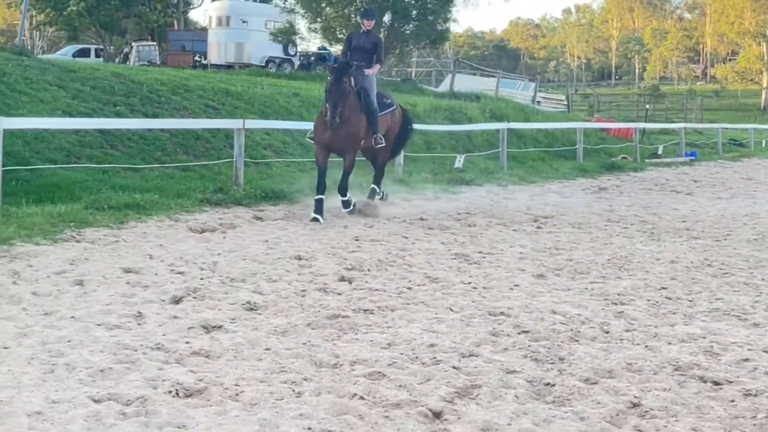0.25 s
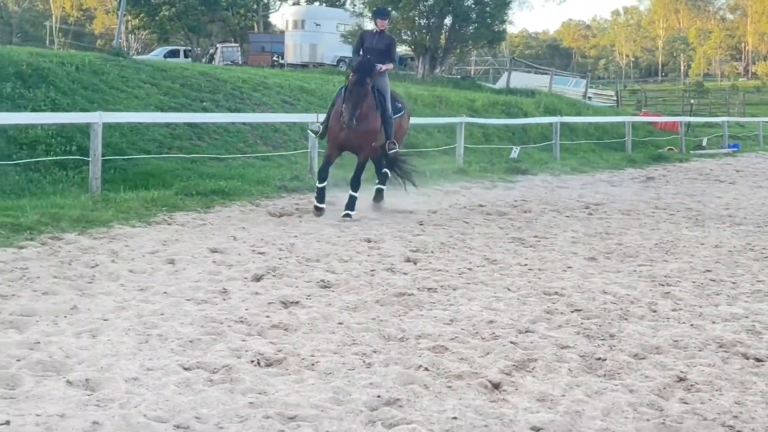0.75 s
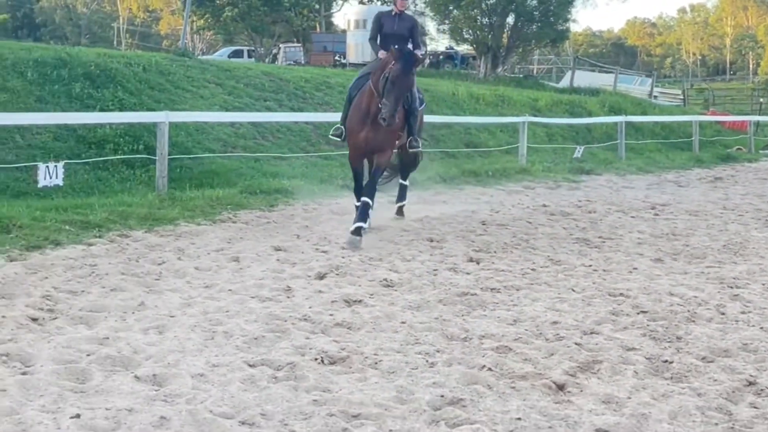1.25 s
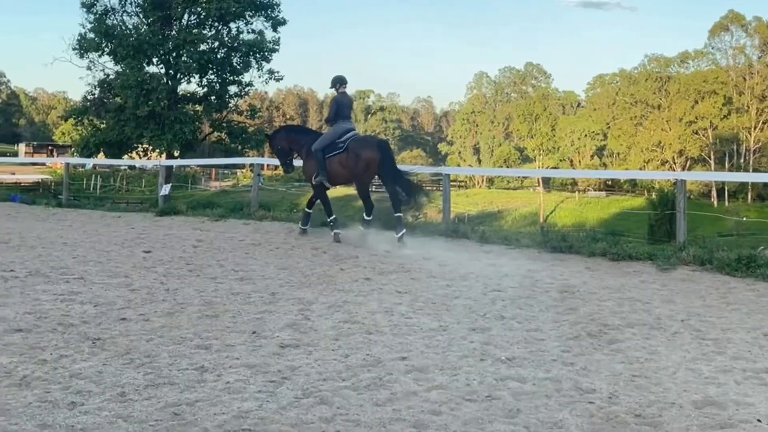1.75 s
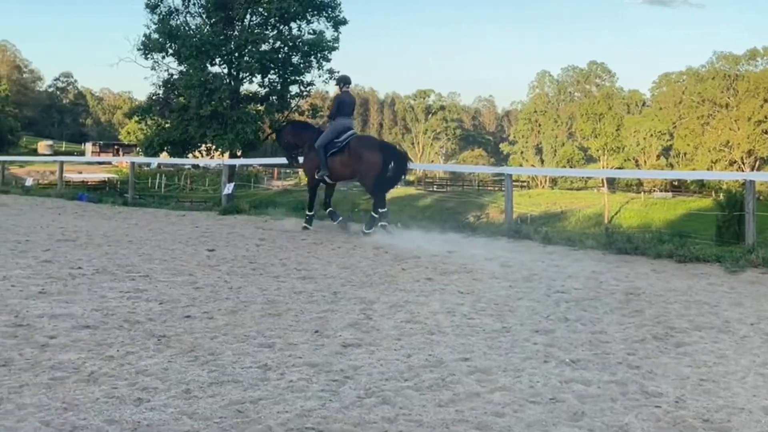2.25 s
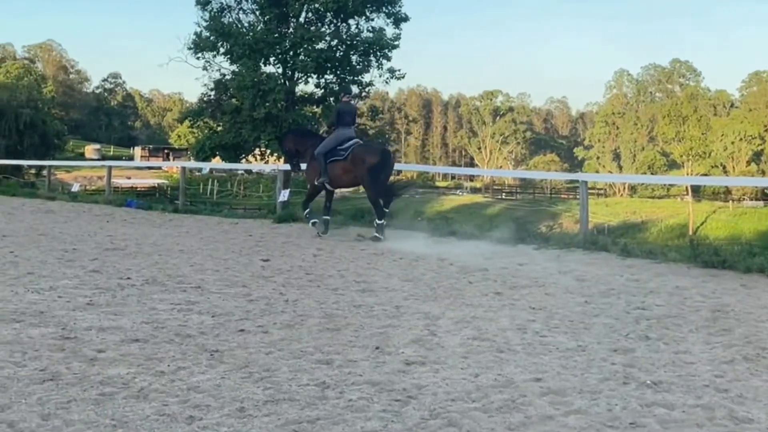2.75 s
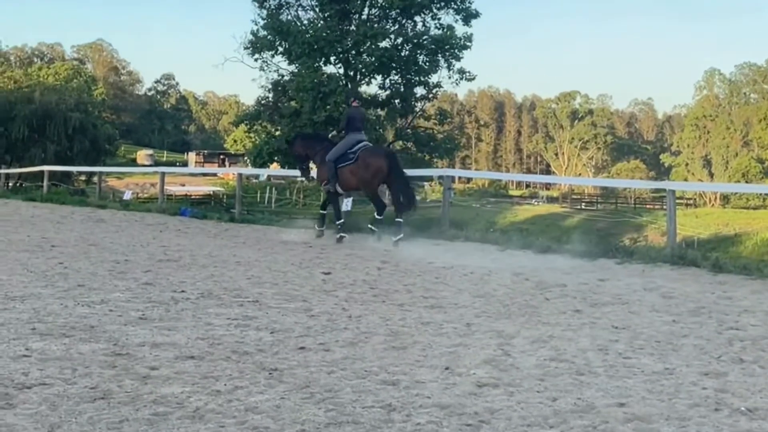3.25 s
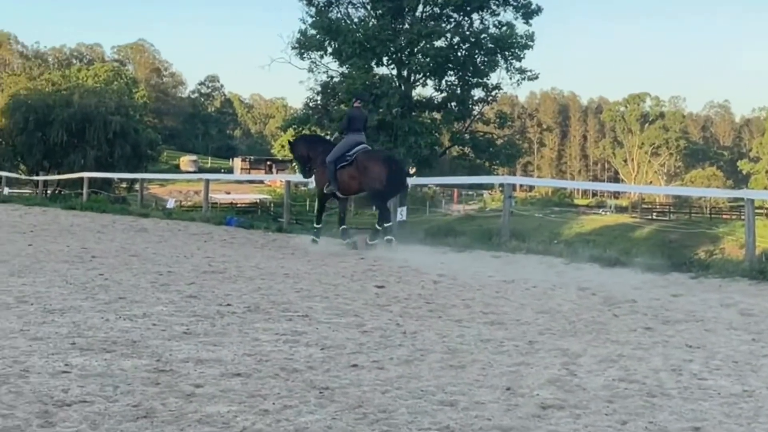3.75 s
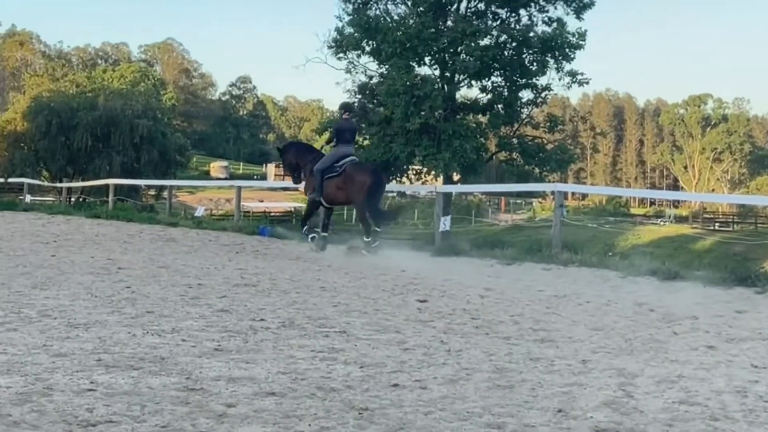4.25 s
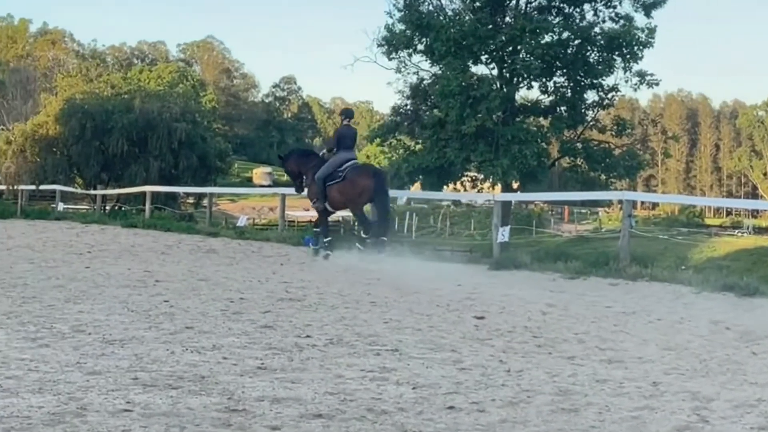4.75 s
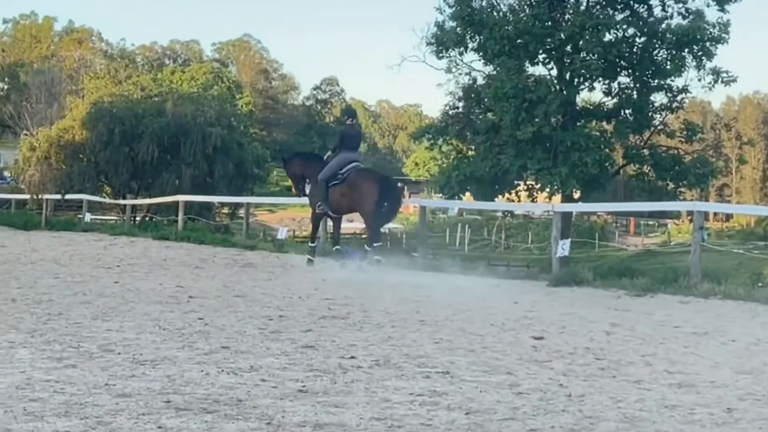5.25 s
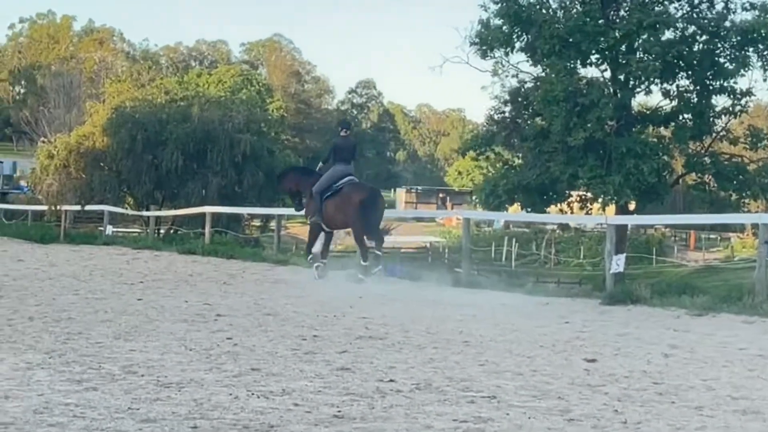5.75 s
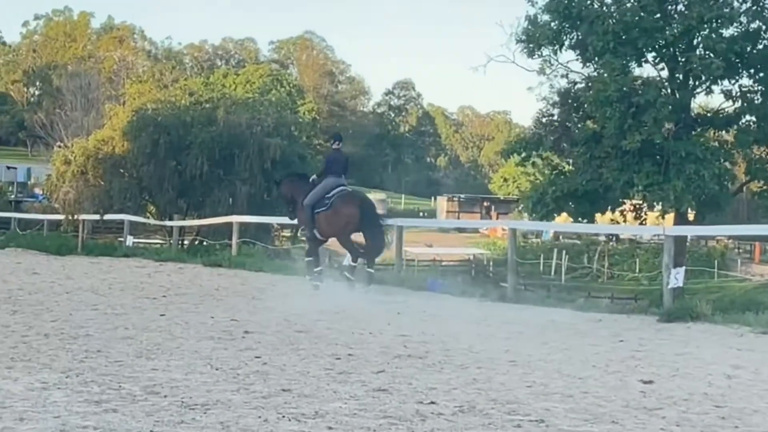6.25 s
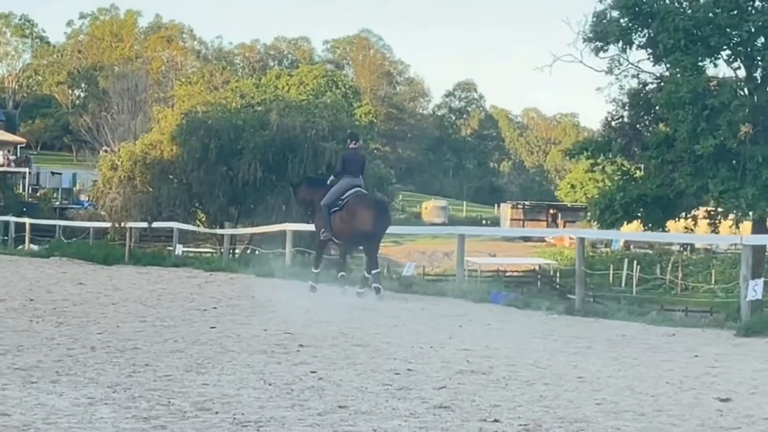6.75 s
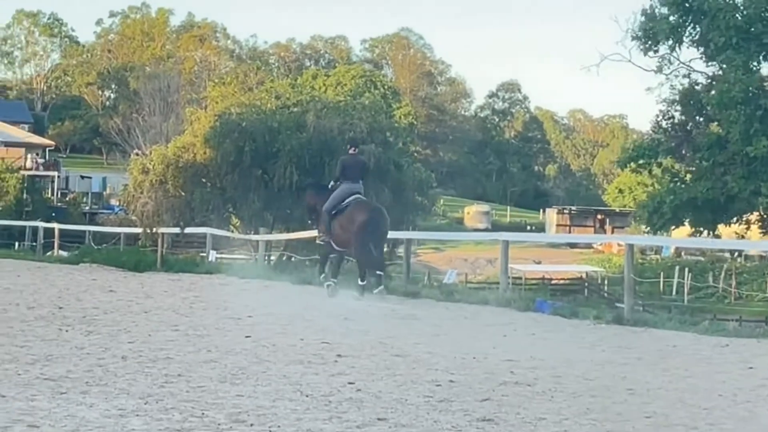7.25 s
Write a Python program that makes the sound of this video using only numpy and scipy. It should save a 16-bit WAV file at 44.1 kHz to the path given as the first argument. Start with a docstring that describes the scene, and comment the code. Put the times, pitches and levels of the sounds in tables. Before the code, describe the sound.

A bright cricket trills in short bursts while breeze thumps the microphone, birds whistle in far trees and a distant horse barely scuffs sand.

```python
"""Sand arena at dusk

A far horse scuffs the sand: dull noise puffs. A close cricket chirps and drawls in sagging tones.
Birds call in the trees as gliding sines; a breeze buffets the microphone with shaped noise and
sinking eddy tones. Dry ticks, a thin insect and a far murmur fill in; the sound drops out once, briefly."""
import sys
import numpy as np
from scipy import signal
from scipy.fft import rfft, irfft, next_fast_len
from scipy.io import wavfile
from scipy.ndimage import uniform_filter1d, map_coordinates

SR = 44100
rng = np.random.default_rng(int(sys.argv[2]) if len(sys.argv) > 2 else 0)


def master_out(mix):
    """Clip the mix to full scale and print it as 16-bit PCM to the path in sys.argv[1]."""
    frames = np.transpose(np.atleast_2d(mix))
    ceiling = np.clip(frames, -1, 1)
    pcm = np.round(ceiling * 32767).astype(np.int16)
    wavfile.write(sys.argv[1], SR, pcm)


def volts_from_decibels(level):
    """Turn decibel levels (scalar or array-like) into linear amplitude factors."""
    exponent = np.asarray(level, float) / 20
    return 10 ** exponent


N = 330292

# brief silence: start_s, end_s
DROPOUT = (1.371, 1.409)


def unit(x):
    """Scales a signal to rms 1."""
    return x / np.sqrt(np.mean(x ** 2) + 1e-20)


def curves(rows):
    """One value per sample for each column after the time."""
    s, *cols = np.transpose(rows)
    return [np.interp(np.arange(N) / SR, s, c) for c in cols]


def wobble(rate):
    """Smooth random curve, rate knots per second (60 at most)."""
    knots = rng.standard_normal(int(N * 60 / SR))
    return map_coordinates(knots, [np.arange(N) * rate / SR])


def coloured(x, spectrum):
    """Filters x by (hz, gain_db) points on a log-frequency axis."""
    m = next_fast_len(len(x) + 8192)
    hz, db = np.transpose(spectrum)
    bins_hz = np.fft.rfftfreq(m, 1 / SR)
    gain_db = np.interp(np.log(bins_hz + 1), np.log(hz + 1), db)
    return irfft(rfft(x, m) * volts_from_decibels(gain_db), m)[:len(x)]


def noise(spectrum):
    """Coloured noise of rms 1."""
    return unit(coloured(rng.standard_normal(N), spectrum))


def steady(x, span):
    """Evens out the chance swells of a noise over span seconds; rms 1."""
    power = np.abs(uniform_filter1d(x ** 2, round(span * SR)))
    return unit(x / np.sqrt(power + 0.12))


def add(track, s, sound):
    """Mixes a sound into the track at time s."""
    part = track[max(round(s * SR), 0):][:len(sound)]
    part += sound[:len(part)]


def echoes(x, wet_db, t60):
    """Scattered answers from trees and fence: a decaying noise tail blurs the sound."""
    t = np.arange(SR // 5) / SR
    tail = rng.standard_normal(len(t)) * volts_from_decibels(-60 * t / t60)
    return x + volts_from_decibels(wet_db) * signal.fftconvolve(x, tail / np.linalg.norm(tail))[:N]


def breeze():
    """Turbulence at the microphone: lumpy rumble, faster flutter, eddies of sinking pitch with low swells."""
    # steady part of the breeze: time_s, rumble_db
    calm_rows = [(0.0, -66), (0.9, -66.5), (1.04, -63.5), (1.98, -61.5), (2.06, -56.5), (2.35, -55),
                 (2.75, -63), (2.84, -58), (3.54, -65), (3.71, -54.5), (4.69, -50), (5.32, -44.5),
                 (6.78, -44), (7.11, -60), (7.36, -58), (7.49, -63)]
    # noise colours: hz, density_db (relative, per Hz)
    rumble_spectrum = [(13, -29.5), (22, -27), (43, -0.5), (67, -0.5), (125, -11), (220, -40.5), (290, -64),
                       (480, -120)]
    flutter_spectrum = [(47, -27.5), (80, 7), (151, 2), (204, -11), (371, -27.5), (418, -31), (600, -41.5),
                        (780, -70), (1320, -120)]
    swell_spectrum = [(13, -41), (22, -22.5), (43, -4.5), (70, 1.5), (125, -9), (220, -34), (290, -65),
                      (480, -120)]
    ruffle_spectrum = [(120, -32), (200, 1.5), (300, 1), (450, -14.5), (700, -35.5), (1200, -120)]
    # passing eddies: time_s, level_db (relative), swell_db
    eddies = [(0.898, -78, -58.5), (1.244, -57, -78), (1.458, -72, -49), (1.567, -61, -45.5),
              (1.68, -80, -53), (1.855, -78, -51), (1.946, -60, -45.5), (2.018, -68, -74),
              (2.327, -60.5, -51), (3.146, -57, -74), (3.528, -52, -78), (3.585, -37, -41),
              (3.77, -58, -82), (3.812, -60, -85), (3.88, -67, -63), (4.109, -70, -41.5), (4.29, -50, -51),
              (4.386, -49.5, -49), (4.446, -53, -43.5), (4.482, -52, -43), (4.555, -41.5, -40),
              (4.629, -45.5, -45.5), (4.699, -48.5, -66), (4.737, -40.5, -36), (4.812, -46.5, -48),
              (4.876, -40.5, -37.5), (5.018, -35.5, -42.5), (5.137, -40.5, -44), (5.203, -48, -38),
              (5.236, -46.5, -55), (5.417, -42, -38.5), (5.462, -45, -50), (5.508, -47.5, -44.5),
              (5.539, -41, -46.5), (5.66, -38, -40), (5.75, -41.5, -48), (5.781, -41, -57),
              (5.881, -48, -47), (5.95, -44, -51), (5.993, -36, -47), (6.038, -39.5, -36.5),
              (6.098, -37.5, -38), (6.144, -42, -65), (6.241, -38, -40.5), (6.334, -46.5, -40),
              (6.449, -43.5, -44), (6.526, -34, -41), (6.545, -30.5, -48), (6.666, -53, -44.5),
              (6.775, -40.5, -51.5), (6.815, -45.5, -41.5), (6.875, -50, -42.5), (6.912, -42.5, -52),
              (7.069, -70, -47.5), (7.26, -57, -52), (7.339, -68, -50)]
    swell_lag_s, swell_width_s = 0.023, 0.032
    ruffle_db, ruffle_lag_s, ruffle_width_s = -14.5, 0.008, 0.014  # level relative to the eddy's

    clock = np.arange(0, N, 64) / SR
    t = np.arange(N) / SR
    calm = volts_from_decibels(curves(calm_rows)[0])
    swells = sum(volts_from_decibels(swell_db) * np.exp(-((clock - s - swell_lag_s) / swell_width_s) ** 2)
                 for s, _, swell_db in eddies)
    swells = np.interp(t, clock, swells)
    lumps = wobble(20)
    out = calm * unit(volts_from_decibels(2 * lumps) * steady(noise(rumble_spectrum), span=0.094))
    out += swells * steady(noise(swell_spectrum), span=0.056)

    # flutter swings 1.186 dB per dB of rumble
    flutter = volts_from_decibels(-63.5) * ((calm + swells) / volts_from_decibels(-50)) ** 1.186
    flicker = volts_from_decibels(2 * lumps + 4.8 * wobble(30))
    out += flutter * unit(flicker * steady(noise(flutter_spectrum), span=0.16))

    # brighter puff round each eddy
    puffs = sum(volts_from_decibels(db + ruffle_db) * np.exp(-((clock - s - ruffle_lag_s) / ruffle_width_s) ** 2)
                for s, db, _ in eddies)
    out += np.interp(t, clock, puffs) * noise(ruffle_spectrum)

    t = np.arange(SR // 10) / SR
    for (s, db, _), (turn, size, drift) in zip(eddies, rng.random((99, 3))):
        fall_hz = 330 * volts_from_decibels(0.14 * (db + 36.5) + 2.1 * (size - 2.0))  # stronger eddies pass faster
        sink_s = 0.00885 + .008 * drift  # time constant of the fall towards 60 Hz
        cycles = fall_hz * sink_s * (1 - np.exp(-t / sink_s)) + 60 * t
        envelope = ((t / sink_s) * np.exp(1 - t / sink_s)) ** 1.82
        add(out, s - .004, volts_from_decibels(db + 3.5) * envelope * np.sin(2 * np.pi * (cycles + turn)))
    return out


def strokes(runs, spacing, length):
    """Evenly spaced wing strokes (s, dB, length s) filling each run; the first is 1 dB softer."""
    return [(s, db - (s == first), length) for first, last, db in runs
            for s in np.linspace(first, last, round((last - first) / spacing) + 1)]


def cricket():
    """Each wing stroke swells, then sags in pitch as the file slows; wider spaced strokes last longer."""
    # runs of quick strokes: first_s, last_s, level_db (relative)
    chirps = [(.062, .125, -73), (.302, .369, -77), (.842, 1.04, -72.5), (1.147, 1.314, -74),
              (1.477, 1.601, -70), (1.751, 1.81, -69.5), (1.851, 1.884, -69), (2.225, 2.343, -65.5),
              (2.453, 2.65, -67), (2.769, 2.91, -65), (3.039, 3.185, -67), (3.299, 3.39, -65),
              (3.525, 3.558, -67), (3.791, 3.991, -64.5), (4.096, 4.241, -65.5), (4.362, 4.528, -65.5),
              (4.642, 4.785, -66), (4.907, 5.022, -64.5), (5.118, 5.179, -69), (5.455, 5.598, -65),
              (5.684, 5.916, -64.5), (6.025, 6.195, -65.5), (6.301, 6.45, -65.5), (6.563, 6.684, -66),
              (6.817, 6.913, -66), (7.185, 7.415, -65)]
    # runs of slow long strokes: first_s, last_s, level_db (relative)
    drawls = [(.527, .569, -77), (.622, .81, -70), (1.94, 2.086, -65.5), (2.168, 2.168, -67),
              (3.607, 3.754, -64.5), (5.222, 5.416, -63), (6.966, 7.114, -63)]
    # wing partials: multiple, level_db (relative)
    partials = [(1, 0.5), (2, -19.5), (3, -23.5), (4, -18)]

    out = np.zeros(N)
    rows = strokes(chirps, spacing=.029, length=.0215) + strokes(drawls, spacing=.048, length=.031)
    for (s, db, length), (tune, sag, size, lean) in zip(rows, rng.standard_normal((400, 4))):
        u = np.arange(round(length * SR)) / (length * SR)
        sag_hz = np.clip(220 + 60 * sag, 40, 300)
        hz = 3860 + 18 * tune - sag_hz * u ** 2.2
        phase = 2 * np.pi * np.cumsum(hz) / SR
        tone = sum(volts_from_decibels(level) * np.sin(k * phase + k) for k, level in partials)
        tone += volts_from_decibels(-31) * np.diff(rng.standard_normal(len(u) + 1))  # rasp of the file
        peak_lean = np.clip(2.12 + 0.79 * lean, .7, 3)  # above 1: peaks late
        envelope = np.abs(np.sin(np.pi * u ** peak_lean)) ** 0.57
        add(out, s - .006, volts_from_decibels(db + 1.0 + 1.48 * size) * envelope * tone)
    near = echoes(out * volts_from_decibels(0.59 * wobble(55)), wet_db=-14.0, t60=0.12)

    # far crickets, 4 dB fainter before the dropout, beating at about 33 strokes per second
    chorus = noise([(3500, -120), (3680, -10.0), (3900, -0.5), (4050, -18.5), (4300, -120)])
    t = np.arange(N) / SR
    far_db = -90 + 2 * wobble(5) - 4 * (t < DROPOUT[0])
    beat = 1 + np.sin(2 * np.pi * (33 * t + 0.37 * wobble(4.7)))
    return near + volts_from_decibels(far_db) * beat * chorus


def birds():
    """Gliding whistles that waver in strength; some calls flutter fast."""
    # short whistles: start_s, length_s, level_db (relative), start_hz, middle_hz, end_hz
    whistles = [(1.27, 0.063, -82, 1710, 2050, 1720), (1.76, 0.033, -83, 2340, 2440, 2320),
                (4.219, .09, -87, 2500, 2420, 2380), (6.91, 0.048, -88, 5620, 5570, 5540),
                (1.83, 0.022, -76, 2200, 2200, 2130), (1.88, 0.024, -75, 1820, 1730, 1630),
                (1.955, 0.044, -78, 1950, 2040, 1940), (2.555, 0.031, -81, 5800, 5800, 5700),
                (2.675, 0.026, -77, 4050, 3990, 3980), (2.73, 0.028, -77, 4050, 3930, 3800),
                (3.255, 0.026, -72, 2730, 2720, 2840), (3.385, 0.05, -81, 4850, 5380, 4950),
                (3.58, .03, -68.5, 4900, 4410, 4430), (3.743, .03, -70.5, 3210, 3130, 3350),
                (4.115, .025, -85, 5600, 5620, 5700), (4.16, .03, -88, 5770, 5850, 5900),
                (4.25, .05, -84, 5800, 5660, 5670), (4.33, 0.054, -85, 2380, 2410, 2530),
                (4.572, 0.014, -73, 3490, 3710, 4030), (4.6, 0.052, -86, 2760, 2790, 2820),
                (5.28, 0.068, -79.5, 1656, 1760, 1850), (5.3, 0.085, -90, 4150, 4380, 4450),
                (6.11, 0.19, -84, 1800, 1754, 1730)]
    # falling slides: start_s, length_s, level_db (relative), start_hz, middle_hz, end_hz, flutter_depth (0-1)
    slides = [(3.345, .105, -74.5, 3400, 2220, 1640, 0.35), (3.956, 0.051, -72, 3500, 2910, 2600, .21),
              (5.701, .12, -77, 2520, 2454, 1610, .37), (6.641, 0.15, -73.5, 3060, 2255, 1485, 0.74)]
    # call that steps up, holds and drops: time_s, pitch_hz
    step_call = [(1.05, 2950), (1.094, 3100), (1.109, 3370), (1.14, 3220), (1.2, 3280), (1.24, 2760)]
    # call that curls upward: time_s, pitch_hz
    rise_call = [(3.455, 2270), (3.485, 2630), (3.503, 3500), (3.52, 3630)]

    def glide(s, length, hz):
        """Three evenly spaced pitch points."""
        return [(s + length * k / 2, hz[k]) for k in range(3)]

    # calls: level_db (relative), flutter_depth, path of (time_s, pitch_hz)
    calls = [(db, 0, glide(s, length, hz)) for s, length, db, *hz in whistles]
    calls += [(db, flutter, glide(s, length, hz)) for s, length, db, *hz, flutter in slides]
    calls += [(-68, 0, rise_call), (-78, 0, step_call)]
    calls += [(-88, 0, [(s, 2 * hz) for s, hz in step_call])]  # its octave
    for s, a, b, c in rng.random((36, 4)):  # faint twitter from distant trees
        start_s = 1.5 + 5.8 * s
        path = [(start_s, 1600 + 1600 * b), (start_s + .03 + .04 * c, 1400 + 1600 * b + 400 * a)]
        calls.append((-90 + 3 * a, .8, path))

    out = np.zeros(N)
    for db, flutter, path in calls:
        s, hz = np.transpose(path)
        t = np.arange(s[0], s[-1], 1 / SR)
        pitch_hz = uniform_filter1d(np.interp(t, s, hz), size=300, mode="nearest")
        u = (t - s[0]) / (s[-1] - s[0])
        envelope = np.abs(np.sin(np.pi * u ** 1.25)) ** .45
        envelope *= 1 + np.clip(flutter, 0, 1) * np.sin(2 * np.pi * 170 * t)
        add(out, s[0], volts_from_decibels(db + 4.5) * envelope * np.sin(2 * np.pi * np.cumsum(pitch_hz) / SR))
    return echoes(out * volts_from_decibels(1.5 * wobble(40)), wet_db=-11, t60=.13)


def burst(length, spiky):
    """60 ms of grains: rises in an eighth of length, falls 18 dB per length."""
    u = np.arange(round(.06 * SR)) / SR / max(length, .001)
    grains = rng.standard_normal((2, len(u)))
    return grains[0] * volts_from_decibels(spiky * grains[1]) * np.minimum(u * 8, 1) * volts_from_decibels(-18 * u)


def hooves():
    """Each hoof pushes sand aside: a dull noise puff, strongest near one kilohertz."""
    # scuffs: start_s, level_db (relative), decay_s (per 18 dB)
    scuffs = [(0.452, -78.5, 0.027), (0.472, -70, 0.011), (0.513, -78.5, 0.023), (0.643, -83.5, 0.046),
              (1.217, -72, 0.033), (1.639, -79, 0.079), (1.739, -79.5, 0.079), (3.14, -78.5, 0.011)]
    # sand colour: hz, gain_db
    sand = [(300, 2), (1150, 14.5), (2000, 1.5), (5000, -26)]
    out = np.zeros(N)
    for s, db, decay_s in scuffs:
        add(out, s, volts_from_decibels(db + 11.5) * burst(decay_s, spiky=1.4))
    return coloured(out, [(100, -64)] + sand + [(12000, -53)])


def ticks():
    """Short broad crackles, each with its own colour, over a scatter of fainter ones."""
    # small dry ticks near the microphone: start_s, peak_db, centre_hz, decay_s (per 18 dB)
    near = [(.039, -65.5, 11000, 0.0034), (.08, -70, 10000, 0.0096), (.243, -68, 6000, .005),
            (0.274, -67, 7000, .004), (0.281, -57, 6700, 0.011), (0.335, -70, 12000, 0.003),
            (0.368, -69, 13000, 0.0051), (.722, -71, 11000, 0.0034), (0.739, -68, 11000, 0.0076),
            (0.817, -57, 4470, 0.003), (0.94, -59, 9900, 0.0028), (1.035, -59.5, 7940, 0.0081),
            (1.102, -70, 9000, 0.0036), (1.953, -61.5, 8950, 0.0052), (2.729, -64.5, 6960, 0.0098),
            (3.139, -54.5, 7000, 0.0068), (3.148, -58.5, 7900, 0.0053), (3.519, -59.5, 9500, 0.0054),
            (5.135, -66, 11000, 0.0059), (5.167, -55.5, 1930, 0.0056), (5.808, -64, 9050, 0.0032),
            (5.931, -60, 2200, .004), (6.203, -63.5, 7000, 0.0094), (6.318, -63, 8100, 0.011),
            (6.705, -68, 4970, .004), (7.079, -53.5, 3050, 0.0029), (7.462, -64.5, 2300, 0.0078)]
    out = np.zeros(N)
    faint = [(s * N / SR, -79 + 6 * size, 7000 + 6000 * tone, .003)
             for s, size, tone in rng.random((60, 3))]
    for s, db, hz, decay_s in near + faint:
        band = [(hz / 8, -40), (hz / 3, -6), (hz, 0), (hz * 1.6, -8), (hz * 4, -40)]
        crackle = coloured(burst(decay_s, spiky=2), band)
        add(out, s, volts_from_decibels(db) * crackle / np.abs(crackle).max())
    return out


def thin_insect():
    """A very high narrow tone pulsing in phrases."""
    # phrases: start_s, end_s, pulses_per_s, level_db (relative)
    phrases = [(0.06, 1.37, 14.5, -91), (1.426, 3.17, 12, -88), (3.36, 3.8, 11, -94),
               (4.04, 4.5, 10.8, -88), (4.66, 5.04, 8, -91), (5.334, 5.99, 8.3, -85),
               (6.12, 6.62, 8, -84.5), (6.81, 7.12, 8.9, -88)]
    t, level = np.arange(N) / SR, np.full(N, volts_from_decibels(-100))
    for start, end, rate, db in phrases:
        pulses = np.abs(np.sin(np.pi * rate * (t - start))) ** 2.2
        level += volts_from_decibels(db) * ((t > start) & (t < end)) * pulses
    tone = np.sqrt(2) * np.sin(2 * np.pi * np.cumsum(15607 + 12 * wobble(21)) / SR)
    return level * volts_from_decibels(0.8 * wobble(20)) * tone


def air():
    """Far leaves, insects and road: smooth noise murmur and hiss over a low drone."""
    # far countryside: time_s, murmur_db, hiss_db (both relative)
    level_rows = [(0.0, -79.5, -95.5), (2.56, -74.5, -89), (6.94, -78, -93), (7.49, -75.5, -90)]
    # noise colours: hz, density_db (relative, per Hz)
    murmur_spectrum = [(120, -18.5), (200, 1), (449, -3.5), (624, -0.5), (1310, -6.5), (1770, -9.5),
                       (3300, -11.5), (4290, -16), (7260, -120)]
    hiss_spectrum = [(2470, -31), (4200, 3.5), (6170, -1), (7490, -4.5), (8620, -5.5), (11600, -20.5),
                     (12400, -17.5), (14900, -12), (15300, -4.5)]
    road_spectrum = [(70, -40), (110, -4), (150, 1), (200, -9), (300, -40)]
    murmur_db, hiss_db = curves(level_rows)
    murmur = volts_from_decibels(murmur_db + 2.0 + 0.31 * wobble(7.3)) * noise(murmur_spectrum)
    hiss_colour = [(2500, -37.5), (3400, 1.0)] + hiss_spectrum[1:]
    hiss = volts_from_decibels(hiss_db + 8.0 + 0.98 * wobble(20)) * noise(hiss_colour)
    road = volts_from_decibels(-74.5 + 1.5 * wobble(2.5)) * noise(road_spectrum)
    return murmur + hiss + road


def scene():
    """All sources on one channel."""
    return (breeze() + cricket() + birds() + hooves() + ticks() + thin_insect() + air())[None]


def roll_off(x):
    """The treble ends steeply here."""
    return signal.sosfilt(signal.butter(12, 15830, fs=SR, output="sos"), x)


def record(dry):
    """Mutes the dropout with 0.84 ms ramps and returns the finished sound."""
    t = np.arange(N) / SR
    outside_s = np.maximum(DROPOUT[0] - t, t - DROPOUT[1])
    gate = np.clip(outside_s / 0.00084, 0, 1)
    return roll_off(dry * gate)


dry = scene()
out = record(dry)
master_out(out)
```